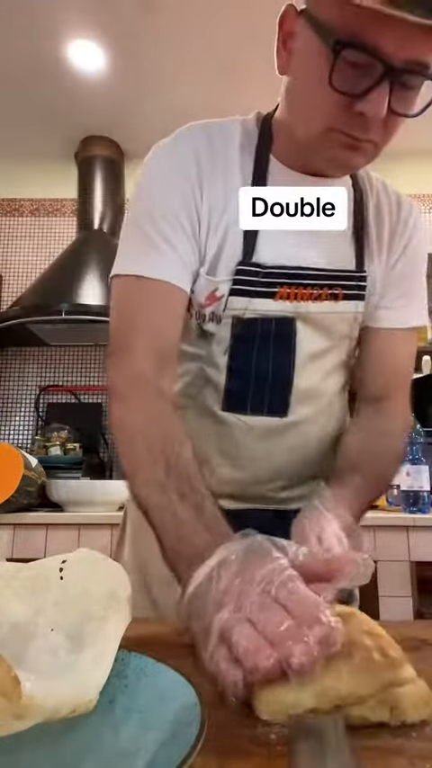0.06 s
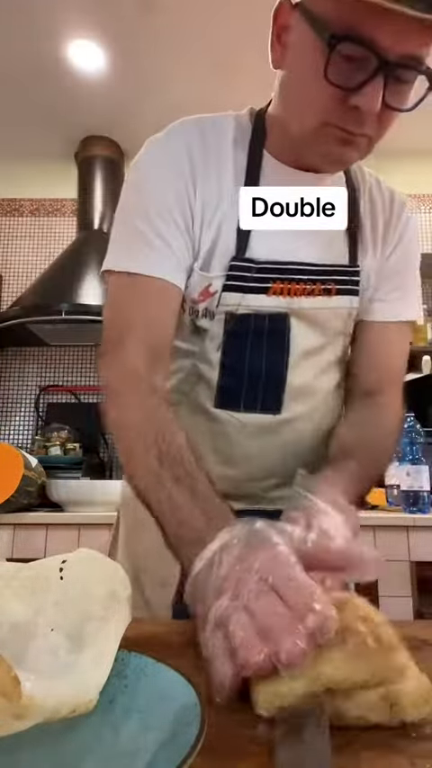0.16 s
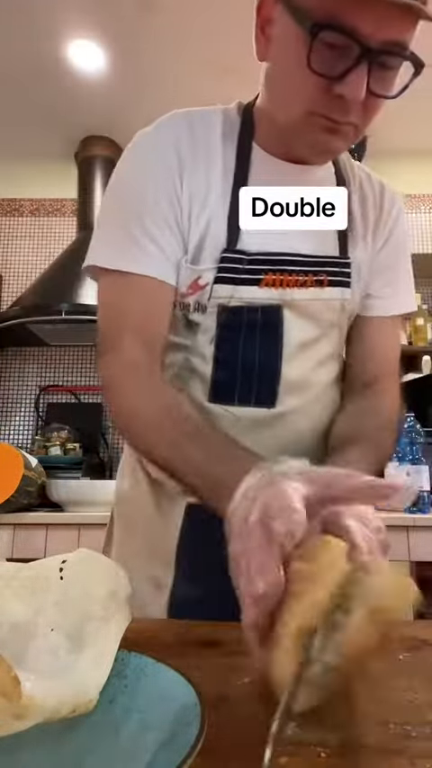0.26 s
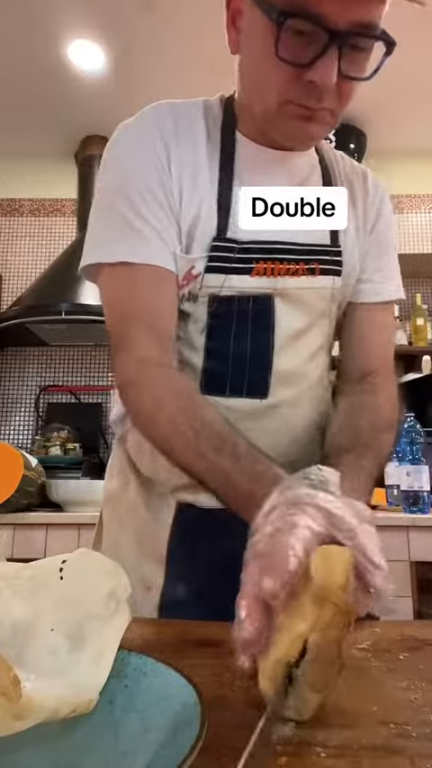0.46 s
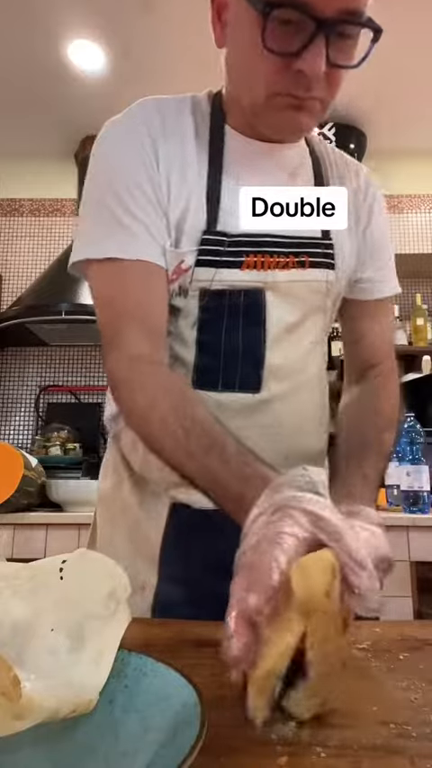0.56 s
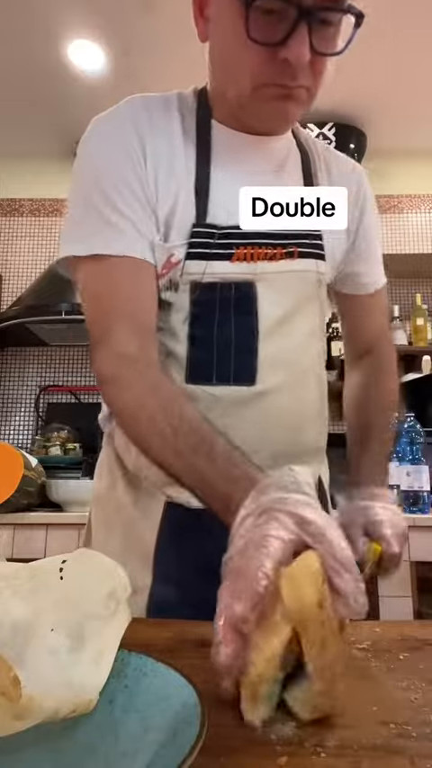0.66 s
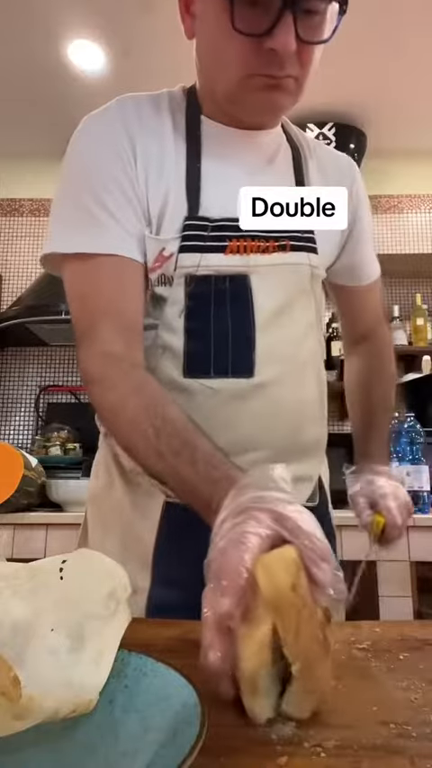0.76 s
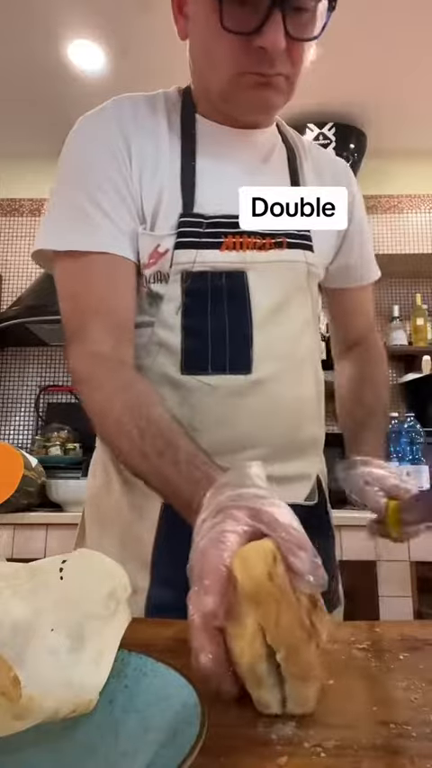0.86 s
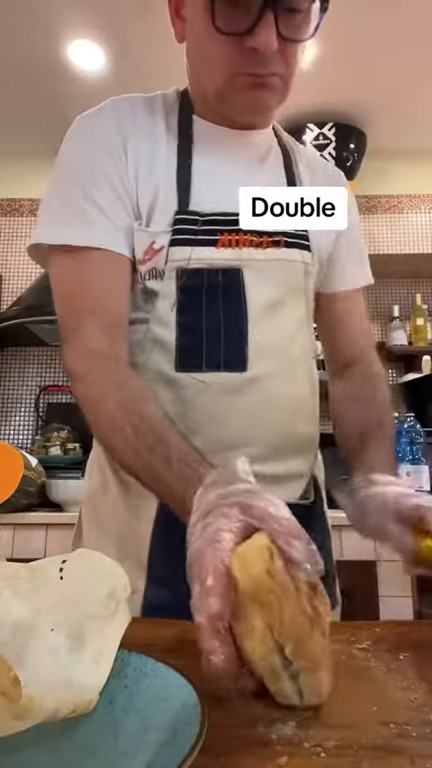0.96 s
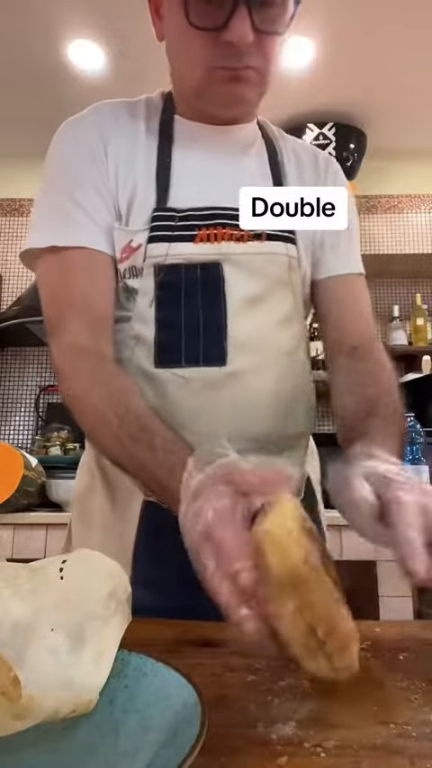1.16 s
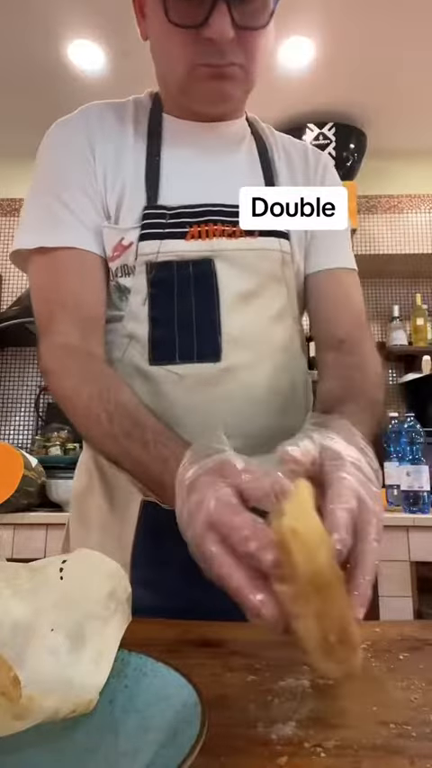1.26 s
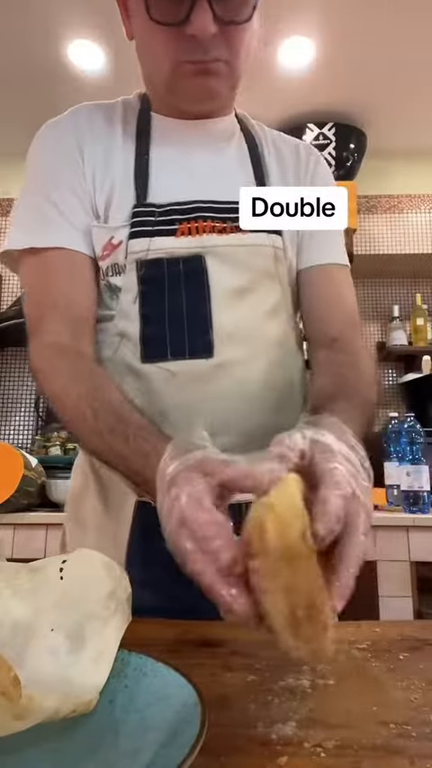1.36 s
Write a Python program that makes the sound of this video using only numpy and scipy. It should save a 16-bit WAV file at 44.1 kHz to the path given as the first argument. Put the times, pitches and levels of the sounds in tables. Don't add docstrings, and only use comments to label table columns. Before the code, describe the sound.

A knife cuts a crusty loaf on a wooden board: a knock, small ticks, a crunchy hollow sawing burst, a brief lull, then the knife drops and rattles; close phone microphone in a small kitchen.

```python
import sys
import numpy as np
from scipy import signal
from scipy.fft import rfft, irfft, next_fast_len
from scipy.io import wavfile
from scipy.ndimage import uniform_filter1d, map_coordinates

SR = 44100
rng = np.random.default_rng(int(sys.argv[2]) if len(sys.argv) > 2 else 0)


def ratio_of_db(decibels):
    return 10 ** (np.asarray(decibels, float) / 20)


def wrap_up_sound(samples):
    columns = np.atleast_2d(samples).T
    tamed = np.clip(columns, -1, 1)
    steps = np.round(tamed * 32767).astype(np.int16)
    wavfile.write(sys.argv[1], SR, steps)


N = 61739


def unit(x):
    return x / np.sqrt(np.mean(x ** 2) + 1e-20)


def curves(rows):
    s, *columns = np.transpose(rows)
    return [np.interp(np.arange(N) / SR, s, column) for column in columns]


def wobble(rate_hz):
    knots = rng.standard_normal(int(N * rate_hz / SR) + 4)
    return map_coordinates(knots, [np.arange(N) * rate_hz / SR])


def filtered(x, response):
    m = next_fast_len(N + 8192)
    return irfft(rfft(x, m) * response(np.fft.rfftfreq(m, 1 / SR)), m)[:N]


def colour(x, points):
    f, db = np.transpose(points)
    return unit(filtered(x, lambda hz: ratio_of_db(np.interp(np.log(hz + 1), np.log(f + 1), db))))


def crackle(rate_hz, spread_db, hiss):
    hits = rng.random(N) < rate_hz / SR
    sizes = ratio_of_db(spread_db * np.minimum(rng.exponential(size=N), 3))
    snaps = hits * sizes * rng.standard_normal(N)
    return unit(snaps) + hiss * rng.standard_normal(N)


def add(track, s, x):
    track[round(s * SR):][:len(x)] += x


# start_s, level_db, rumble_above_level_db
BACKGROUND = [(0, -28.5, -7), (.15, -33.5, 0.5), (.24, -26.5, 3), (.45, -20.5, -7), (.6, -44, 4),
              (.7, -38.5, 2.5), (.88, -38, 6), (.96, -54.5, 19), (1.0, -60.5, 26.5), (1.07, -61.5, -4.5),
              (1.15, -55.5, -1), (1.26, -45.5, -2), (1.33, -38.5, 0.5), (1.4, -47.5, 1.5)]
# freq_hz, density_db
GLOVE_RUSTLE = [(180, -26), (300, -11), (494, -7), (847, -8), (1070, -14), (2040, -10), (5060, -13),
                (6930, -19.5), (9010, -32.5), (15200, -120)]
# freq_hz, density_db
KITCHEN_HUM = [(15, -48), (25, -3.5), (70, 2.5), (113, -1), (204, 0), (400, -16.5), (520, -45), (880, -120)]


def background():
    level_db, rumble_db = curves(BACKGROUND)
    rustle = ratio_of_db(0.62 * wobble(40)) * colour(crackle(470, 1, 2.0), GLOVE_RUSTLE)
    rumble = ratio_of_db(rumble_db - 3 + 0.83 * wobble(28)) * colour(rng.standard_normal(N), KITCHEN_HUM)

    answer_s, answer_end_s, fall_db_per_s = 0.95, 1.052, 107
    s = np.arange(N) / SR
    dull_air = unit(filtered(crackle(500, 2, 2.8), lambda hz: hz / (hz + 300) / (1 + (hz / 2500) ** 4)))
    gate = np.clip(np.minimum(s - answer_s, answer_end_s - s) / 0.024, 0, 1)
    answer = gate * ratio_of_db(-37.5 - fall_db_per_s * abs(s - answer_s)) * dull_air
    gated_air = ratio_of_db(-57) * dull_air
    return ratio_of_db(level_db - 1.0) * (rustle + rumble) + answer + gated_air


# start_s, peak_db, click_db, ring_length_factor
BOARD_KNOCKS = [
    (.0005, -13.5, 7, 0.25),
    (0.207, -10.5, -1.5, 0.34),
    (0.348, -13.5, -6, 0.28),
]
# start_s, peak_db, click_db, ring_length_factor
KNIFE_LANDING = [
    (.8952, 1.5, -3, 1),
]
# pitch_hz, level_db, t60_s
WOOD_MODES = [(479, 2, .17), (640, -6, .12), (958, -6, .06), (1370, -5, .05), (1750, -5, .035),
              (2266, -6, .014), (2470, -7, .015), (3300, -7, .014)]
# freq_hz, density_db
CONTACT_NOISE = [(88, -42.5), (150, 0.5), (351, -3), (646, 6.5), (1890, -3), (2480, 4.5), (3370, -6.5),
                 (6930, -18), (9010, -75.5), (15200, -120)]


def knocks():
    out, t = np.zeros(N + SR), np.arange(SR // 4) / SR
    choke_s, choke_db_per_s = .035, 500
    choke_db = -choke_db_per_s * np.maximum(t - choke_s, 0)
    for s, db, click_db, length in BOARD_KNOCKS + KNIFE_LANDING:
        ring = np.zeros(len(t))
        for hz, level, t60 in WOOD_MODES:
            mode_db = level + rng.normal(0, 1) - 60 * t / (t60 * length)
            ring += ratio_of_db(mode_db) * np.sin(2 * np.pi * hz * t)
        crack = colour(rng.standard_normal(N), CONTACT_NOISE)[:len(t)] * ratio_of_db(click_db - 60 * t / .016)
        attack = 1 - np.exp(-t / .0003)
        add(out, s, ratio_of_db(db + choke_db) / 2 * attack * (ring + crack))
    return out[:N]


# start_s, level_db,
# pitch_hz, t60_s
LOW_THUMPS = [(.205, -36.5, 90, .08), (.28, -18, 125, 0.16), (0.372, -11.5, 61, 0.062),
              (0.492, -15, 64, 0.11), (0.63, -16.5, 52, 0.2), (.9, -11, 61.6, .12),
              (0.021, -21.5, 54, .15), (0.439, -22, 190, .3), (.99, -31, 51, 0.21)]
# start_s, level_db, pitch_hz, t60_s
HOLLOW_NOTES = [(.001, -15, 950, 0.056), (.206, -13, 1106, 0.025), (.206, -8.5, 1676, 0.022),
                (.262, -19.5, 679, 0.14), (.483, -4, 605, 0.13), (.585, -18.5, 637, 0.1),
                (.352, -22, 920, 0.062), (0.361, -11.5, 382.4, 0.19), (.924, -12.5, 895, 0.079)]


def thumps_and_rings():
    out, t = np.zeros(N + SR), np.arange(SR // 4) / SR
    for s, db, hz, t60 in LOW_THUMPS + HOLLOW_NOTES:
        attack = 1 - np.exp(-t * hz * 2)
        add(out, s, ratio_of_db(db - 60 * t / t60) * np.sin(2 * np.pi * hz * t) * attack)
    return out[:N]


# start_s, peak_db, pitch_hz, t60_s
BLADE_TICKS = [(.059, -17.5, 2500, .019), (0.255, -38, 2520, .015), (.276, -9.5, 2205, .015),
               (0.292, -14, 1980, .018), (.319, -8, 1960, .015), (0.632, -30, 1710, .016),
               (.71, -28.5, 1700, .015), (0.9433, -19, 2000, .012), (.986, -27, 1500, .03),
               (1.28, -33, 2400, .015), (1.314, -28, 2110, .013)]
# start_s, peak_db, pitch_hz, t60_s
KNIFE_BOUNCES = [
    (.895, -3, 2500, .014),
    (.9243, 0, 2050, .014),
    (.9272, -1, 2150, .016),
    (.9312, -2, 2000, .016),
    (.9566, 4.5, 2250, .007),
]


def ticks():
    out, t = np.zeros(N + SR), np.arange(SR // 8) / SR
    for s, db, hz, t60 in BLADE_TICKS + KNIFE_BOUNCES:
        upper = ratio_of_db(-4) * np.sin(2 * np.pi * hz * 1.3 * t)
        tone = np.sin(2 * np.pi * hz * t) + upper
        edge = ratio_of_db(-11) * colour(rng.standard_normal(N), CONTACT_NOISE)[:len(t)]
        attack = 1 - np.exp(-t / 0.00018)
        add(out, s, ratio_of_db(db - 60 * t / t60) * attack * (tone + edge))
    return out[:N]


# freq_hz, density_db
CRUST_SPECTRUM = [(90, -48), (250, -25), (600, -5.5), (1150, -7), (1600, -3), (2700, -8.5), (3200, -17.5),
                  (6900, -28.5), (9000, -66), (15000, -120)]


def crust_snaps():
    t = np.arange(400) / SR
    ring_cycles, snaps_per_s = 4.5, 5000
    grains = np.zeros(N)
    for hz in 300 * 1.3 ** np.arange(14):
        ring = np.sin(2 * np.pi * hz * t) * np.exp(-t * hz * 2 / ring_cycles)
        snaps = crackle(snaps_per_s / 14, 3, .55)
        grains += np.sqrt(hz) * unit(signal.fftconvolve(snaps, ring)[:N])
    spectrum = rfft(grains)
    smooth = np.sqrt(uniform_filter1d(np.abs(spectrum) ** 2, size=500))
    return colour(irfft(spectrum / smooth, N), CRUST_SPECTRUM)


def hollow_loaf(peaks):
    def response(f):
        total = 0
        for k, (hz, width, db) in enumerate(peaks):
            band = 1j * f * width / (hz * hz - f * f + 1j * f * width)
            total = total + (-1) ** k * ratio_of_db(db) * band ** 2
        return total
    return unit(filtered(crackle(800, 2.5, 1.0), response))


# start_s, level_db, brightness_db, hollow_db
SAW_STROKE = [(0.242, -32.5, 23, 1.5), (.275, -21, -1, -3), (0.336, -32.5, 17, -2),
              (0.351, -13.5, -10, 2.5), (0.413, -16, 12.5, 6), (0.437, -10, 7, -10.5), (0.489, -7.5, -8, 0),
              (.558, -14.5, -7, -3), (.6, -38, 1, 5)]
# pitch_hz, width_hz, level_db
LOAF_RESONANCES = [
    [(378, 60, 0), (490, 70, -2), (890, 100, 0)],
    [(625, 75, 0), (900, 100, -4), (1620, 200, -3)],
]


def cut():
    level_db, bright_db, hollow_db = curves(SAW_STROKE)
    s = np.arange(N) / SR
    crust = crust_snaps()
    top = filtered(crust, lambda hz: hz ** 4 / (hz ** 4 + 3500.0 ** 4))

    shut, opened = [hollow_loaf(peaks) for peaks in LOAF_RESONANCES]
    opens_s, opening_s = .45, .06
    openness = np.clip((s - opens_s) / opening_s + .5, 0, 1)
    body = np.sqrt(1 - openness) * shut + np.sqrt(openness) * opened

    start_s, end_s = SAW_STROKE[0][0], SAW_STROKE[-1][0] + 0.059
    on = np.clip(np.minimum(s - start_s, end_s - s) / 0.0053, 0, 1)
    level = on * ratio_of_db(level_db + 1.5 * wobble(69.2))
    return level * (crust - top + ratio_of_db(bright_db) * top + ratio_of_db(hollow_db - 6) * body)


def rattle():
    start_s, end_s, t60_s = .9, .96, .5
    u = np.arange(N) / SR - start_s
    on = np.clip(np.minimum(u / .001, (end_s - start_s - u) / .01), 0, 1)
    level = ratio_of_db(-16 - 60 * abs(u) / t60_s + 1.5 * wobble(150))
    return on * level * colour(crackle(1500, 2, 1), CONTACT_NOISE)


def scene():
    near = cut() + knocks() + thumps_and_rings() + ticks() + rattle()
    t = np.arange(SR // 4) / SR
    tail = rng.standard_normal(len(t)) * ratio_of_db(-60 * t / .09)
    delayed = np.pad(near, (200, 0))
    wet = signal.fftconvolve(delayed, tail / np.linalg.norm(tail))[:N]
    return (near + ratio_of_db(-24) * wet + background())[None]


def low_pass(x):
    return signal.sosfilt(signal.butter(12, 15800, fs=SR, output="sos"), x)


def record(dry):
    x = signal.sosfilt(signal.butter(2, 38, 'high', fs=SR, output='sos'), dry[0])
    x = filtered(x, lambda hz: 1 / (1 + (hz / 10000) ** 40))
    clip, hardness = .99, 40
    x = x / (1 + np.abs(x / clip) ** hardness) ** (1 / hardness)
    x = filtered(x, lambda hz: hz < 15800)
    return low_pass(np.clip(x, -1, 1)[None])


dry = scene()
out = record(dry)
wrap_up_sound(out)
```